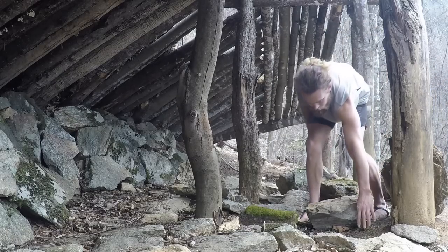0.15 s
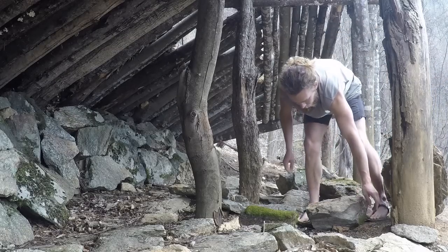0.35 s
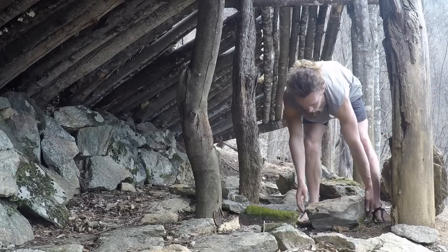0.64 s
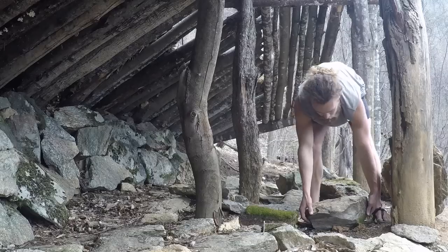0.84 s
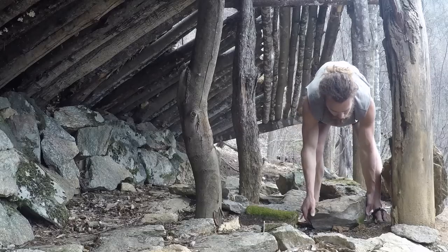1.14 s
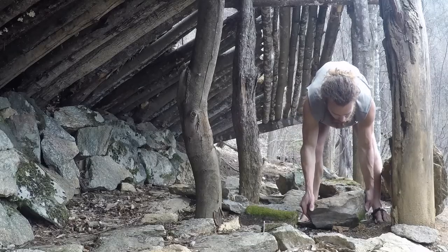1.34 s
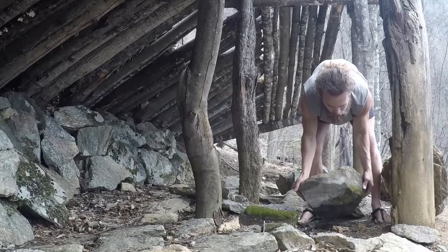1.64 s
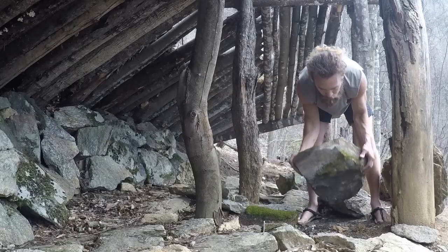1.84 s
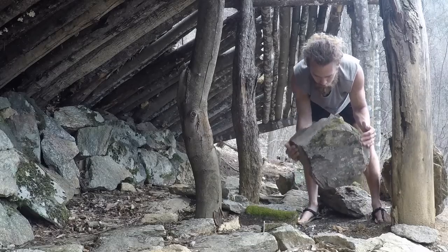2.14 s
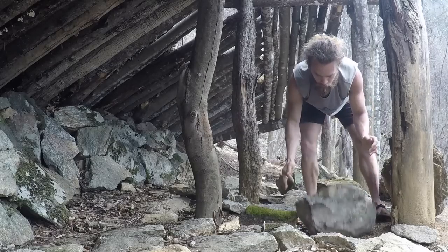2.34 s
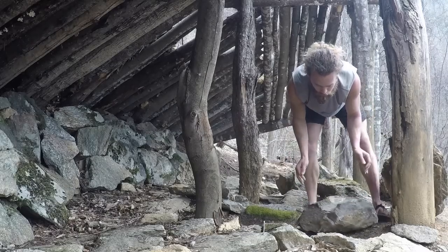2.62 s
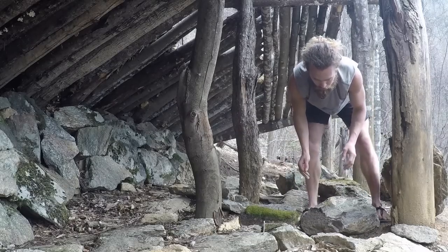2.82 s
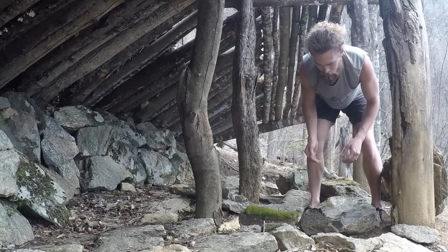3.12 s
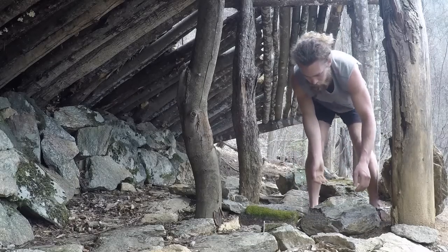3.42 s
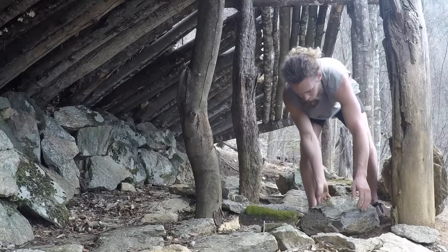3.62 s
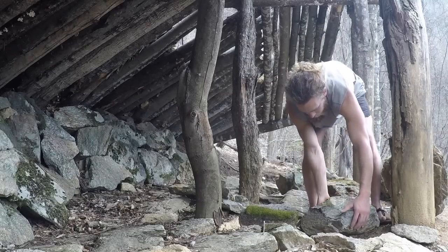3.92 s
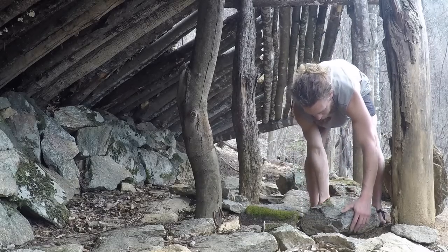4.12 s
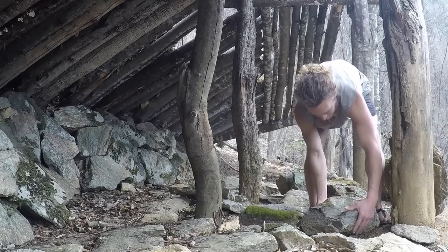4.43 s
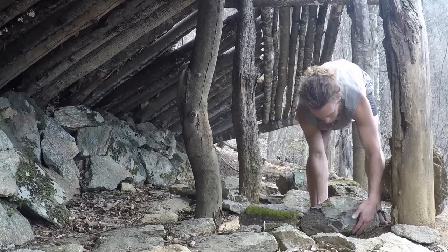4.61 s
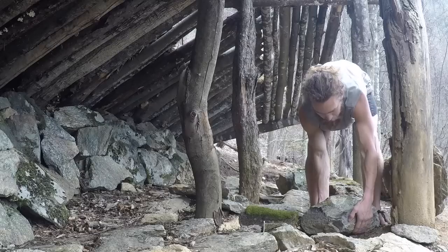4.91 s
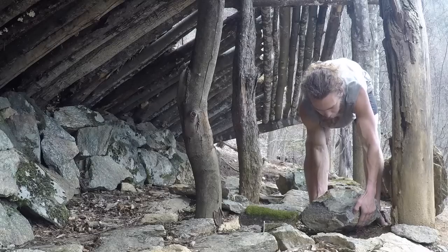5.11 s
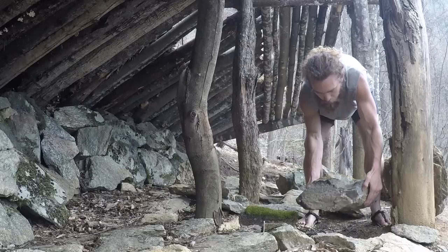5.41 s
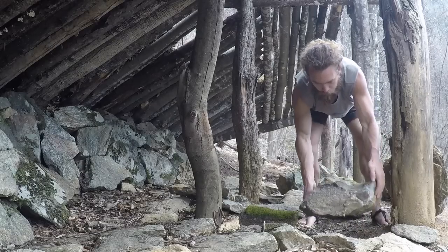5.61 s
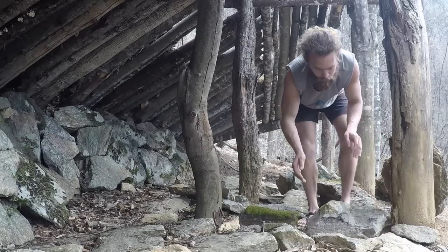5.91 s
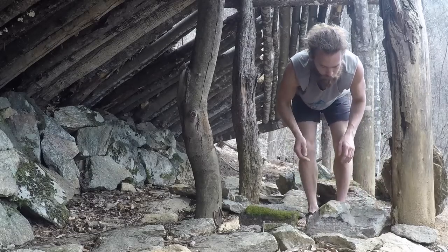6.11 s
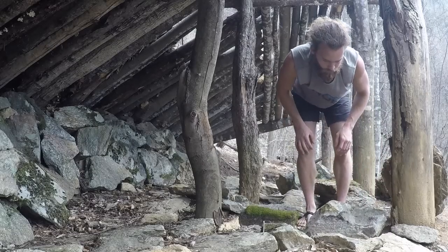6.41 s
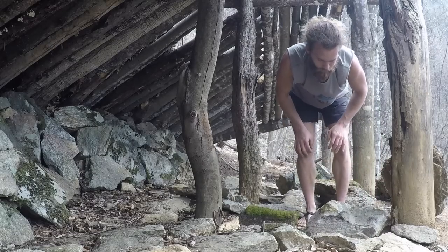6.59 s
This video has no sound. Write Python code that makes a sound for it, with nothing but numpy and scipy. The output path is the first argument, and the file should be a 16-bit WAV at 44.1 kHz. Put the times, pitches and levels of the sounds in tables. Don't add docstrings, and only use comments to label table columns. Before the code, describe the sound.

Two hard stone-on-stone impacts about three seconds apart, with gritty crunch, ground thump and scattered debris over faint forest hiss.

```python
import sys
import numpy as np
from scipy import signal
from scipy.fft import rfft, irfft, next_fast_len
from scipy.io import wavfile
from scipy.ndimage import uniform_filter1d

SR = 44100
rng = np.random.default_rng(int(sys.argv[2]) if len(sys.argv) > 2 else 0)


def to_linear_factor(level_db):
    exponent = np.asarray(level_db, float) / 20
    return 10 ** exponent


def persist_wave(psi):
    counts = np.round(np.clip(psi, -1, 1) * 32767).astype(np.int16)
    wavfile.write(sys.argv[1], SR, np.atleast_2d(counts).T)


N = 297675
AIR_DB = -66


def svf(x, hz, width):
    g, k = np.tan(np.pi * hz / SR), width / hz
    return signal.lfilter([k * g, 0, -k * g], [1 + g * (g + k), 2 * (g * g - 1), 1 + g * (g - k)], x)


def unit(x):
    return x / np.sqrt(np.mean(x ** 2))


def walk(rate):
    hold = int(SR / rate)
    levels = rng.standard_normal(size=4096)[:N // hold + 1]
    slewed = uniform_filter1d(np.repeat(levels, hold), hold)
    return 1.3 * uniform_filter1d(slewed, hold)[:N]


def equalise(x, points):
    hz, db = np.transpose(points)
    size = next_fast_len(N)
    bins_hz = np.arange(1, size // 2 + 2) * SR / size
    gain = to_linear_factor(np.interp(np.log(bins_hz), np.log(hz), db))
    return irfft(rfft(x, size) * gain, size)[:N]


def fade(s, t60, rise, size=6000):
    t = np.arange(size) / SR
    return int(s * SR), t, (1 - np.exp(-t / rise)) * np.exp(-np.log(1000) * t / t60)


def add(out, i, x):
    out[i:i + len(x)] += x[:len(out) - i]


def burst(size, hz, octaves, rough_db):
    jumps = np.repeat(rng.standard_normal(size // 32 + 1), 32)[:size]
    spikes = rng.standard_normal(size) * to_linear_factor(rough_db * jumps)
    width = hz * min(2 ** (octaves / 2) - 2 ** (-octaves / 2), 3)
    return unit(svf(svf(spikes, hz, width), hz, width))


def crumble(rows):
    out = np.zeros(N)
    for s, db, hz, t60, octaves in rows:
        i, t, env = fade(s, t60, 0.00026)
        add(out, i, to_linear_factor(db) * env * burst(len(t), hz, octaves, rough_db=2))
    return out


def touches(rows):
    out = np.zeros(N)
    for s, db, hz, _ in rows:
        touch = svf(signal.unit_impulse(512), hz, hz)
        add(out, int(s * SR), to_linear_factor(db + 4) * touch / np.max(touch))
    return out


# (time [s], peak level [dB], crack level [dB], crack t60 [s], crack centre [Hz],
# contact length [cycles])
STONE_BLOWS = [
    (2.3759, -22.5, -20, 0.029, 5970, 0.99),
    (5.734, -32, -34.5, 0.0624, 1810, 0.31),
    (5.8175, -23.5, -48, 0.072, 2500, 1),
]
# (frequency [Hz], level [dB], t60 [s])
SLAB_MODES = [
    [(955, 1.5, 0.056), (1047, 2.5, 0.05), (2056, -5.5, 0.042), (2540, -8, 0.058), (3400, -8, .05),
     (3800, -2, 0.041), (5170, -8, 0.052), (6500, -10, 0.023), (8150, -4.5, 0.012), (8800, -2, 0.025),
     (13500, -14, 0.0222)],
    [(419, -1.5, 0.058), (892, 1, 0.041), (1255, 2.5, 0.029), (1528, -1.5, 0.065), (1860, -9, 0.046),
     (2760, -5, .04), (3780, -7, .04)],
    [(392, 1.5, 0.049), (349, -1, 0.065), (446.4, -15.5, 0.092), (730, -28.5, .05), (1760, -28, 0.036)],
]


def blows():
    out = np.zeros(N)
    for (s, db, crack_db, crack_t60, crack_hz, cycles), modes in zip(STONE_BLOWS, SLAB_MODES):
        for k, (hz, mode_db, t60) in enumerate(modes):
            i, t, env = fade(s, t60, cycles / hz)
            sign = (-1) ** (k // 2)
            add(out, i, sign * to_linear_factor(db + mode_db) * env * np.sin(2 * np.pi * hz * t))
        i, t, env = fade(s, crack_t60, 0.00043)
        add(out, i, to_linear_factor(crack_db) * env * burst(len(t), crack_hz, 1.6, rough_db=3.5))
    return out


# (time [s], level [dB], centre [Hz], t60 [s], width [octaves])
CRUSHED_FACES = [(2.36, -44, 4000, .06, 3.8), (2.364, -33, 1470, 0.052, 2.1),
                 (2.3639, -37.5, 6000, 0.076, 2.1), (2.364, -45, 12500, .06, .6),
                 (2.376, -34, 13500, .015, .5), (2.377, -31, 563, 0.072, 1.1),
                 (2.379, -30, 2560, 0.061, 1.6), (2.382, -42, 7000, 0.083, 1.4),
                 (5.719, -52, 7000, .04, 2.1), (5.729, -45, 2000, 0.074, 2.8),
                 (5.735, -35, 604, 0.067, 1.7), (5.735, -49, 6500, 0.089, 2.3), (5.81, -49, 6500, .12, 2.1),
                 (5.817, -40.5, 1290, 0.066, 1), (5.822, -37, 524, 0.09, 0.94),
                 (5.824, -50.5, 7560, 0.1, 0.9), (5.825, -47.5, 3020, .08, 0.86)]


def crush():
    return crumble(CRUSHED_FACES)


# (time [s], frequency [Hz], level [dB], t60 [s])
SOIL_THUMPS = [(1.342, 334, -59, 0.067), (1.405, 212, -56.5, 0.05), (2.3754, 168, -26.5, 0.027),
               (2.388, 58, -40, 0.24), (2.408, 148, -40, 0.066), (2.495, 131.5, -47.5, .08),
               (2.497, 276, -50.5, .06), (2.6, 126, -57, 0.078), (5.742, 59, -28.5, 0.21),
               (5.744, 162, -34.5, .06), (5.818, 180, -29, 0.041), (5.924, 100, -50, 0.054),
               (5.925, 285, -48, 0.0395)]
# (time [s], frequency [Hz], level [dB], t60 [s])
SOIL_SQUEEZES = [
    (2.3659, 125.3, -24.5, 0.042),
    (2.385, 100.7, -33.5, 0.1),
]
# (time [s], level [dB])
SOIL_SWINGS = [
    (2.369, -28),
    (2.439, -36),
    (2.539, -51),
    (2.675, -55),
    (2.742, -53.5),
    (2.845, -59.5),
    (5.739, -27.5),
    (5.843, -39.5),
    (6.005, -52),
    (6.095, -56),
]


def ground():
    swing_hz, swing_t60 = 30.4, 0.39
    swings = [(s, swing_hz, db, swing_t60) for s, db in SOIL_SWINGS]
    out = np.zeros(N)
    for sign, rows in ((-0.9, SOIL_THUMPS + swings), (0.95, SOIL_SQUEEZES)):
        for s, hz, db, t60 in rows:
            i, t, env = fade(s, t60, 0.00171, size=24000)
            add(out, i, sign * to_linear_factor(db) * env * np.sin(2 * np.pi * hz * t))
    return out


# (time [s], level [dB], centre [Hz], t60 [s])
CHIP_AND_LITTER_TICKS = [(.451, -63.5, 2300, 0.059), (0.552, -55.5, 1900, 0.085), (2.244, -66, 7000, .04),
                         (2.49, -46.5, 730, 0.0984), (2.577, -56, 1080, 0.088), (2.623, -47.5, 4000, 0.036),
                         (2.672, -50, 1160, 0.073), (2.674, -56, 448, 0.084), (2.694, -55, 2200, 0.036),
                         (2.753, -56.5, 3000, .04), (2.753, -55.5, 8900, .04), (2.766, -50.5, 1170, .043),
                         (2.839, -62, 1560, .04), (2.979, -62.5, 6500, .06), (3.378, -56, 2200, 0.041),
                         (3.767, -58, 1980, 0.076), (4.052, -59, 3550, .034), (4.864, -59, 8450, .03),
                         (4.922, -61.5, 2200, 0.022), (5.79, -56, 8000, .026), (5.882, -43.5, 2620, 0.026),
                         (5.883, -49.5, 7500, .02), (6.192, -46, 2060, 0.0304), (6.192, -63, 7000, 0.019),
                         (6.425, -59.5, 6000, 0.055)]


def chips():
    return crumble([(*row, 1.2) for row in CHIP_AND_LITTER_TICKS]) + touches(CHIP_AND_LITTER_TICKS)


# (time [s], level [dB], centre [Hz], t60 [s])
LITTER_SNAPS = [(2.292, -49.5, 5460, .033), (2.306, -47.5, 5260, .072), (3.368, -58, 4000, .05),
                (3.512, -50.5, 3980, 0.051), (3.739, -61, 6000, 0.128), (3.768, -58, 5000, .04),
                (5.92, -51, 597, 0.056), (6.0, -60, 2020, 0.043), (6.114, -56.5, 1600, 0.087),
                (6.3, -67, 1500, 0.049), (6.69, -66.5, 120, .15)]


def snaps():
    return crumble([(*row, 3) for row in LITTER_SNAPS]) + touches(LITTER_SNAPS)


# (time [s], level [dB], centre [Hz], gritty edge over level [dB])
STONE_ROCKING = [
    (1.34, -56, 580, -14),
    (1.35, -54.5, 610, -6),
    (1.378, -55.5, 800, -14),
    (1.402, -54.5, 890, -5),
    (1.411, -59, 1100, -5),
    (1.42, -53, 690, -14),
    (1.432, -61, 1000, -9),
]
# (centre [Hz], width [octaves], level [dB])
ROCKING_EDGE = [(2200, 0.42, -3), (6800, 1.8, -1)]


def rocking():
    rows = []
    for s, db, hz, edge_db in STONE_ROCKING:
        rows.append((s, db, hz, 0.063, 1.66))
        for band_hz, octaves, band_db in ROCKING_EDGE:
            rows.append((s, db + edge_db + band_db, band_hz, 0.052, octaves))
    return crumble(rows)


# (peak time [s], peak level [dB], rise over 20 dB [s],
# fall over 20 dB [s], fineness [dB]); a negative rise starts late, a negative fall ends early
LOOSE_GRIT = [(2.39, -34, 0.0017, 0.0469, -1), (2.49, -62.5, 0.06, 0.15, 5), (2.58, -61.5, 0.1, 0.28, 7),
              (2.69, -58.5, 0.06, 0.09, -5), (2.76, -62, .02, .2, 0), (3.512, -58.5, -0.0075, .04, 2),
              (5.731, -53, 0.03, 0.06, -1), (5.744, -42, 0.0046, 0.0476, -7),
              (5.806, -49, 0.0935, 0.06, -1), (5.836, -54, 0.02, 0.14, -2), (5.92, -57, 0.1, .25, -1.5),
              (6.119, -57, 0.09, 0.18, -1.5), (6.199, -61.5, -0.04, 0.22, -4), (6.3, -70.5, 0.4, 0.4, -2)]
LITTER_SHUFFLES = [(.05, -68.5, -1, 0.38, -1), (1.1, -77, -0.1, 0.4, 9), (1.73, -64.5, 0.18, 0.16, -1.5),
                   (2.15, -65, .07, 0.09, 5), (3.25, -72.5, 0.35, .3, 0), (3.364, -68.5, -0.05, 0.4, 0),
                   (3.58, -71.5, 0.1, 0.37, -3.5), (4.444, -70, 0.14, -0.07, 0),
                   (4.77, -71.5, -0.16, .18, -5), (4.9, -73, -0.06, 0.3, -1.5), (5.6, -64, 0.04, -0.3, 7.5),
                   (5.642, -62.5, 0.07, 0.09, 5.5)]
# (centre [Hz], width [Hz])
GRAIN_BANDS = [(2350, 4760), (743, 1540), (6970, 11500), (12800, 6500)]
GRAIN_BAND_DB = [0, -3, -3, -12.5]
GRAIN_FINE_SLOPE = [0.16, -0.71, 0.95, 0.97]


def grit():
    hits = rng.random(N) < 700 / SR
    sizes = to_linear_factor(np.minimum(4.5 * rng.exponential(size=N), 12))
    grains = unit(hits * sizes * rng.choice([-1, 1], N))
    clumps = to_linear_factor(2.1 * walk(120))
    bands = []
    for hz, width in GRAIN_BANDS:
        flicker = to_linear_factor(0.715 * walk(60))
        rub = 0.96 * grains + rng.standard_normal(N)
        bands.append(clumps * flicker * unit(svf(svf(rub, hz, width), hz, width)))

    power, t = np.zeros((len(bands), N)), np.arange(N) / SR
    for rows, bend in ((LOOSE_GRIT, 1.01), (LITTER_SHUFFLES, 1.5)):
        for s, db, rise, fall, fine_db in rows:
            on = slice(max(int((s - 2 * rise) * SR), 0), int((s + 2 * fall) * SR))
            distance = np.maximum((s - t[on]) / rise, (t[on] - s) / fall)
            slide = to_linear_factor(db - 20 * distance ** bend)
            band_gain = to_linear_factor(np.array(GRAIN_BAND_DB) + fine_db * np.array(GRAIN_FINE_SLOPE))
            power[:, on] += np.outer(band_gain, slide) ** 2
    return np.sum(np.sqrt(power) * bands, axis=0)


# (time [s], length [s], start [Hz], end [Hz], width [Hz], level [dB])
PALM_SLIPS = [
    (5.575, 0.1, 1400, 4000, 570, -56),
    (.01, .21, 2150, 2800, 170, -66),
    (1.7, 0.06, 1400, 1800, 360, -75),
    (1.7, 0.137, 2250, 2000, 390, -67),
    (3.8, .06, 2900, 3700, 200, -70),
]


def slips():
    out, t = np.zeros(N), np.arange(6000) / SR
    for s, length, start_hz, end_hz, width, db in PALM_SLIPS:
        share = np.clip(t / length, 0, 1)
        hz = start_hz * (end_hz / start_hz) ** share
        glide = np.sin(2 * np.pi * np.cumsum(hz) / SR)
        rub = unit(svf(rng.standard_normal(len(t)), width / 2, width))
        add(out, int(s * SR), to_linear_factor(db) * np.sin(np.pi * share) * rub * glide)
    return out


def shelter(x):
    _, t, env = fade(0, 0.17, 0.0034, size=16000)
    tail = env * svf(rng.standard_normal(len(t)), 1730, 4300)
    tail /= np.sqrt(np.sum(tail ** 2))
    return x + to_linear_factor(-20) * signal.fftconvolve(x, tail)[:N]


# (time [s], length [s], frequency [Hz], level [dB])
BIRD_NOTES = [
    (.1, .13, 4300, -80),
    (0.269, 0.23, 4280, -80),
    (3.238, 0.14, 4280, -78),
    (3.52, 0.13, 2220, -79),
    (6.183, 0.066, 4380, -73),
    (6.2, 0.21, 3170, -78),
    (6.48, .27, 5760, -81),
]


def birds():
    out, waver, flutter = np.zeros(N), walk(39), to_linear_factor(2.7 * walk(50))
    for s, length, hz, db in BIRD_NOTES:
        share = np.arange(int(length * SR)) / (length * SR)
        swell = np.sqrt(2 * np.sin(np.pi * share))
        phase = 2 * np.pi * np.cumsum(hz * (1 + 0.004 * waver[:len(share)])) / SR
        add(out, int(s * SR), to_linear_factor(db) * swell * np.sin(phase))
    return out * flutter


# (frequency [Hz], level per Hz [dB])
AIR_COLOUR = [(12, -30.5), (20, 0.5), (62, -2), (304, -9), (718, -10), (825, -9.5), (4240, -21),
              (4740, -18.5), (6250, -22.5), (9480, -18), (12900, -20.5), (14000, -21), (15200, -15.5)]
# (time [s], level [dB])
LEAF_BREEZE = [(0.0, -65), (1.02, -71.5), (2.37, -69.5), (2.56, -57), (2.82, -73.5), (3.59, -67),
               (4.38, -72), (5.55, -73.5), (5.9, -59.5), (6.75, -72)]


def air():
    s, db = np.transpose(LEAF_BREEZE)
    breeze_db = np.interp(np.arange(N) / SR, s, db)
    leaves = unit(svf(rng.standard_normal(N), 1230, 1880)) * to_linear_factor(breeze_db - 4.5 + walk(5.2))
    rumble = unit(svf(rng.standard_normal(N), 45, 38)) * to_linear_factor(-78.5 + 2 * walk(4.57))
    hiss = unit(equalise(rng.standard_normal(N), AIR_COLOUR)) * to_linear_factor(AIR_DB - 0.5 + 1.28 * walk(7.1))
    return hiss + leaves + rumble


WHINE_LEVELS = [-81, -80.5, -79]


def whine():
    tone_hz, frame_hz = 4740, 60 / 1.001
    phase = 2 * np.pi * np.cumsum(tone_hz * (1 + 0.009 * walk(400))) / SR
    frame = (np.arange(N) / SR * frame_hz - 0.6) % 1
    gate = np.clip((frame - 0.17) / 0.27, 0, 1)
    return gate * sum(to_linear_factor(db + 4.5) * np.sin((k + 1) * phase) for k, db in enumerate(WHINE_LEVELS))


# (frequency [Hz], level [dB])
SIDE_COLOUR = [(60, -23), (110, -17.5), (200, -13), (380, -10.5), (700, -14), (1290, -18), (2380, -10),
               (4400, -6.5), (8120, -2), (15000, -5.5)]


def scene():
    small_contacts = shelter(crush() + rocking() + chips() + snaps())
    soft = small_contacts + ground() + grit() + slips() + air() + whine() + birds()
    top_edge = signal.ellip(8, 0.2, 60, 15150, fs=SR, output="sos")
    mid = signal.sosfilt(top_edge, soft) + shelter(blows())

    loud = uniform_filter1d(mid ** 2, size=2048) / to_linear_factor(2 * AIR_DB)
    wobble = walk(200)
    wobble = wobble - uniform_filter1d(wobble, size=1500)
    side = equalise(mid * wobble * (1 + loud) ** -0.3, SIDE_COLOUR)
    return np.array([mid + side, mid - side])


def roll_off(x):
    return signal.sosfilt(signal.butter(12, 16290, fs=SR, output="sos"), x)


def record(dry):
    mix = dry - 0.41 * svf(dry, 10430, 1360)
    return roll_off(mix)


dry = scene()
out = record(dry)
persist_wave(out)
```